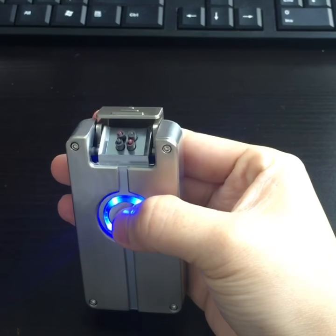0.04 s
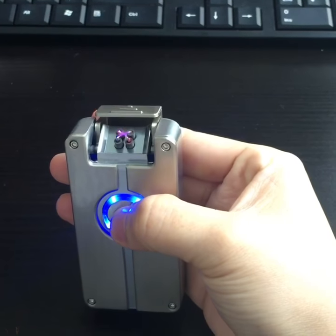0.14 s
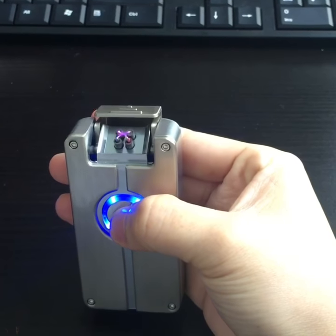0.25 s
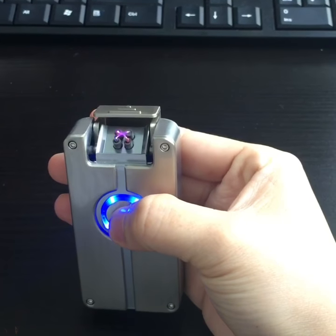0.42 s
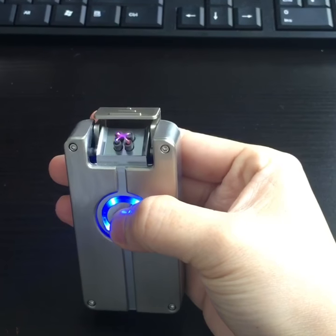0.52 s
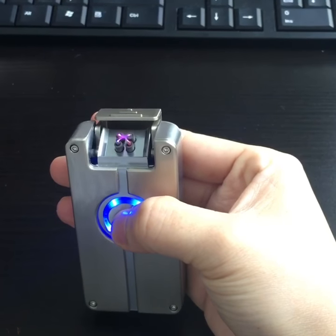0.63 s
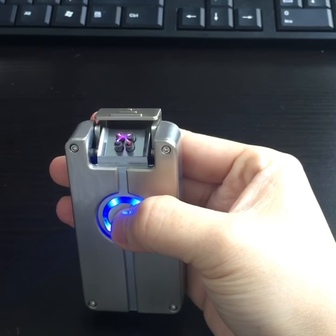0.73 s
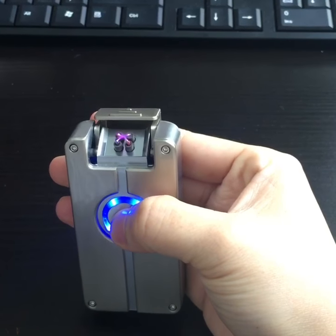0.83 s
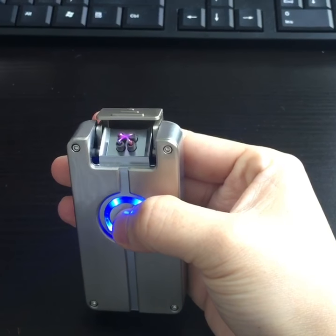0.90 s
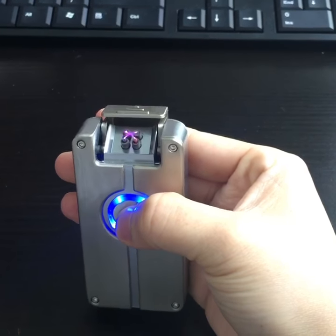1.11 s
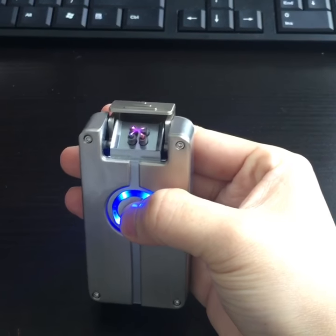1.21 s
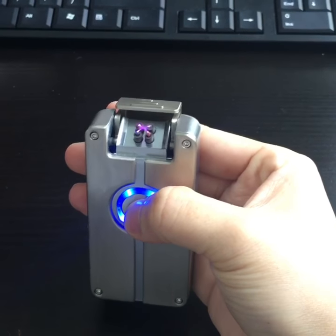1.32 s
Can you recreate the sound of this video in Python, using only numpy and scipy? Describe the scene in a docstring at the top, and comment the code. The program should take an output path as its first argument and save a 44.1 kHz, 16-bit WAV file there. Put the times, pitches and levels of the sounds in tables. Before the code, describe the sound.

A metal arc lighter's button clicks with a low thump and brief ring; the arc instantly hisses, breaks into dry crackles and pops, and weakens. Close microphone, quiet room, faint desk and wall reflections.

```python
"""In a quiet room, low rumble and mains hum (shaped noise and steady sines) last throughout.
A thumb rubs a lighter's button (faint noise), which ticks (short noise and ringing), then snaps with a thump.
At the snap the electric arc strikes: dense random pulses hiss, then grow fewer and crackle over a soft fizz.
Later come separate loud sparks (single pulses in a sputter), with one short flare of dense pulses among them.
The lighter is close to the ear; desk and walls answer it faintly."""
import sys
import numpy as np
from scipy import signal
from scipy.fft import rfft, irfft, next_fast_len
from scipy.io import wavfile
from scipy.ndimage import uniform_filter1d, minimum_filter1d

SR = 44100
rng = np.random.default_rng(int(sys.argv[2]) if len(sys.argv) > 2 else 0)


def wav_out(sig):
    """Save sig, one row per channel (or a flat mono array), as 16-bit PCM at SR to the path in sys.argv[1]."""
    wavfile.write(sys.argv[1], SR, np.round(np.clip(np.atleast_2d(sig).T, -1, 1) * 32767).astype(np.int16))


N = 59535
T = np.arange(N) / SR  # time of each sample, s
SNAP_S = .2362  # the button gives way and the arc strikes


def amp(db):
    """Turn decibels into a gain."""
    return 10 ** (np.asarray(db) / 20)


def unit(x):
    """Scale a sound to an rms of 1."""
    return x / np.sqrt(np.mean(x ** 2) + 1e-20)


def gain(points, hz):
    """Read the gain at hz from a colour table, with pitch on a log axis."""
    f, db = np.transpose(points)
    return amp(np.interp(np.log(hz + 1), np.log(np.sort(f) + 1), db))


def filtered(x, response):
    """Weight each frequency of x by a response, which may also shift its phase."""
    size = next_fast_len(N + SR // 2)  # spare room so the end does not wrap to the start
    spectrum = rfft(x, size) * response(np.fft.rfftfreq(size, 1 / SR))
    return irfft(spectrum, size)[:N]


def noise(points):
    """Random noise with the given colour and an rms of 1."""
    return unit(filtered(rng.standard_normal(N), lambda hz: gain(points, hz)))


def coloured(x, points, size=2048):
    """Colour pulses without any sound before them, and keep each pulse's energy."""
    # Folding the cepstrum forward in time gives the minimum-phase pulse of this colour
    cepstrum = irfft(np.log(gain(points, np.fft.rfftfreq(size, 1 / SR))))
    cepstrum[1:size // 2] *= 2
    cepstrum[size // 2 + 1:] = 0
    pulse = irfft(np.exp(rfft(cepstrum)))
    return signal.fftconvolve(x, pulse / np.linalg.norm(pulse))[:N]


def decay(start, t60):
    """A sudden start that fades by 60 dB in t60 seconds."""
    return (T >= start) * amp(-60 * np.maximum(T - start, 0) / t60)


def ringing(start, modes):
    """Fading sine tones, all struck at one moment."""
    total = 0
    for hz, db, t60 in modes:
        total = total + amp(db) * decay(start, t60) * np.sin(2 * np.pi * hz * (T - start))
    return total


def discharges(rate):
    """Tiny sparks as random pulses of uneven size, rate a second, with a mean power of 1."""
    size_spread_db = 4.5
    chance = np.clip(rate / SR, 1e-4, 1)  # of a pulse in each sample
    sizes = amp(size_spread_db * np.clip(rng.standard_normal(N), -2, 2))
    pulses = (rng.random(N) < chance) * sizes
    centred = pulses - chance * sizes.mean()
    # Dividing by sqrt(chance) keeps the power even as the pulses grow fewer
    return -unit(centred / np.sqrt(chance))


# The arc's steady burn: t/s, level/dB, discharges (1/s)
ARC_BURN = [(.238, -25, 9000), (0.269, -31.5, 9000), (.345, -31, 7200), (0.364, -38, 3350),
            (0.466, -37.5, 1470), (.478, -48, 870), (.57, -48, 800), (.6, -55.5, 750), (0.63, -44, 800),
            (.72, -55.5, 580), (.82, -54.5, 540), (.86, -67.5, 400), (.93, -56.5, 610), (1.03, -62, 510),
            (1.13, -58.5, 590), (1.35, -62, 430)]
# Loudness of the soft fizz: t/s, level/dB
FIZZ_LEVEL = [(.24, -43.5), (.45, -46), (.49, -53), (.7, -56.5), (.84, -61), (.915, -60.5), (.93, -53),
              (1.0, -58), (1.08, -62), (1.095, -50), (1.16, -57), (1.28, -56), (1.35, -54.5)]
# Colour of the dense hiss, also of the flare: f/Hz, level/dB (relative, per Hz)
HISS_COLOUR = [(40, -20), (150, -3), (300, 4), (900, -4.5), (2400, -2), (5000, -3.5), (7200, 3), (8100, -3),
               (9200, 4.5), (10400, -2), (11400, 2.5), (13000, -3), (14400, 6), (15200, -53)]
# Colour of the thin crackle, also of bright sparks: f/Hz, level/dB (relative, per Hz)
CRACKLE_COLOUR = [(40, -29), (150, -2.5), (320, 12), (850, -1.5), (2000, -0.5), (2800, -3), (4200, 1),
                  (5000, -5), (7200, 3), (8100, -4), (9000, 3), (10400, -3.5), (11300, 4), (12500, -2.5),
                  (14000, -43), (15500, -51.5)]
# Colour of the soft fizz: f/Hz, level/dB (relative, per Hz)
FIZZ_TONE = [(60, 17), (400, 6), (900, 4.5), (2000, 3), (3000, 0), (5000, -2), (7200, -3), (10000, -7),
             (12300, -11), (13600, -30), (15000, -40)]


def arc():
    """Many discharges a second blur into a hiss; fewer are heard as crackle, over a soft fizz."""
    t, db, rate = np.transpose(ARC_BURN)
    rate = np.interp(T, t, rate)
    lit = T > SNAP_S
    burn = lit * amp(np.interp(T, t, db)) * discharges(rate)
    dense = np.clip(rate / 1800, 0, 1) ** 2  # 1 = all hiss, towards 0 = crackle
    hiss = coloured(burn * dense, HISS_COLOUR)
    crackle = coloured(burn * (1 - dense), CRACKLE_COLOUR)
    fizz = lit * amp(np.interp(T, *np.transpose(FIZZ_LEVEL))) * noise(FIZZ_TONE)
    return hiss + crackle + fizz


# Single loud sparks: t/s, level/dB, dullness (0 bright to 1 dull)
LOUD_SPARKS = [(0.4822, -16, 0.0), (0.5054, -18, 0.0), (0.5178, -19, 0.0), (0.5243, -16, 0.0),
               (0.5332, -17, 0.0), (0.5451, -18, 0.0), (0.5568, -21, 0.1), (0.5618, -20, 0.0),
               (0.5697, -20, 0.0), (0.5757, -15, 0.0), (0.5786, -17, 0.0), (0.5863, -24, 0.0),
               (0.6318, -17, 0.0), (0.6364, -22, 0.1), (0.6638, -22, 0.0), (0.6807, -20, 0.0),
               (0.6846, -21, 0.0), (0.6895, -22, 0.0), (0.6918, -25, 0.0), (0.6961, -22, 0.0),
               (0.7117, -22, 0.0), (0.719, -23, 0.0), (0.746, -28, 0.0), (0.7747, -28, 0.0),
               (0.7832, -28, 0.0), (0.7981, -28, 0.0), (0.8565, -26, 0.0), (0.8593, -29, 0.0),
               (0.8833, -24, 0.0), (0.9243, -26, 0.0), (0.9332, -26, 0.0), (0.9678, -24, 0.4),
               (0.9737, -21, 0.0), (0.9914, -27, 0.3), (1.0939, -26, 0.0), (1.1273, -28, 0.0),
               (1.1701, -23, 0.0), (1.1757, -26, 0.2), (1.1804, -22, 0.1), (1.1927, -27, 0.2),
               (1.215, -24, 0.5), (1.2395, -25, 0.3), (1.2987, -21, 0.2), (1.3036, -28, 0.4),
               (1.3127, -26, 1.0), (1.3227, -28, 0.8), (1.3258, -18, 1.0)]
# Colour of the dull sparks: f/Hz, level/dB (relative, per Hz)
DULL_COLOUR = [(40, -15), (300, 1.5), (900, 4.5), (2100, 7), (4200, -2), (5500, -8), (9000, -4),
               (12500, -14), (15000, -42)]


def sparks():
    """Each loud spark is one sharp pulse inside a brief sputter; some are bright, some dull."""
    sputter_db, sputter_s = -18, 0.00047  # level beside the pulse; time to fade to 1/e on each side
    bright, dull = np.zeros((2, N))
    sputter = amp(sputter_db) * rng.standard_normal(N)
    for t, db, dullness in LOUD_SPARKS:
        crack = sputter * np.exp(-abs(T - t) / sputter_s)
        crack[round(t * SR)] = -1  # the sharp pulse itself
        bright += amp(db) * (1 - dullness) * crack
        dull += amp(db) * dullness * crack
    return coloured(bright, CRACKLE_COLOUR) + coloured(dull, DULL_COLOUR)


# Colour of the flare's low puff: f/Hz, level/dB (relative, per Hz)
PUFF_COLOUR = [(50, -13), (170, 3), (350, -2.5), (700, -25), (1200, -8.5), (2500, -32), (8000, -45)]


def flare():
    """The arc leaps: a short swell of dense discharges with a low puff at its middle."""
    start_s, length_s, rate = .637, 0.021, 5500  # rate in discharges per second
    burst_db, puff_db = -32, -34
    swell = np.sin(np.pi * np.clip((T - start_s) / length_s, 0, 1)).clip(0)
    burst = coloured(amp(burst_db) * np.sqrt(swell) * discharges(rate), HISS_COLOUR)
    puff = amp(puff_db) * swell ** 2 * noise(PUFF_COLOUR)
    return burst + puff


# Light ticks as the button starts to move: t/s, level/dB
BUTTON_TICKS = [(.1993, -37.5), (0.2126, -54)]
# Colour of each tick's noise: f/Hz, level/dB (relative, per Hz)
TICK_COLOUR = [(200, -15), (700, 2), (1500, 2), (3000, -4), (8000, -13), (14500, -19), (16000, -30)]
# Tones the button rings with at each tick: f/Hz, level/dB (relative), fade by 60 dB (s)
BUTTON_TONES = [(1275, -1.5, 0.018), (2990, -7, 0.021), (5230, -8.5, 0.018), (8100, -9.5, .02)]
# Colour of the push just before the snap: f/Hz, level/dB (relative, per Hz)
PUSH_COLOUR = [(25, -25), (80, 0), (200, 5.5), (450, -3.5), (900, -19), (3000, -30.5), (8000, -70)]
# Colour of the thump through the metal case: f/Hz, level/dB (relative)
THUMP_COLOUR = [(20, -33), (35, -14.5), (58, -4.5), (110, -5.5), (155, -0.5), (260, -3.5), (400, -5),
                (470, -8.5), (540, -7.5), (650, -12), (1100, -15.5), (2100, -22.5), (2700, -28.5),
                (5000, -44), (8000, -41.5), (14500, -38.5), (16400, -66)]
# Tones the metal case rings with: f/Hz, level/dB, fade by 60 dB (s)
CASE_TONES = [(2075, -25, 0.026), (3100, -26, 0.069), (3400, -33, 0.087), (3700, -38, 0.11)]
# Colour of the loose button's rattle: f/Hz, level/dB (relative, per Hz)
RATTLE_COLOUR = [(300, -3), (1000, 1), (3500, 4), (5000, -10), (14500, -6), (16000, -19)]


def button():
    """Ticks and a swelling push, then the snap: a thump with late bass, a ringing case and a rattle."""
    tick_t60_s = 0.015
    push_db, push_rise_s = -22.5, .007
    snap_db, lag_cycles, zero_shift_hz = 29.5, 0.506, 2910
    rattle_db, rattle_t60_s = -17, 0.033

    ticks = 0
    for t, db in BUTTON_TICKS:
        touch = decay(t, tick_t60_s) * noise(TICK_COLOUR)
        ticks = ticks + amp(db) * (touch + ringing(t, BUTTON_TONES))
    swell = (T < SNAP_S) * np.exp(-abs(T - SNAP_S) / push_rise_s)
    push = amp(push_db) * swell * noise(PUSH_COLOUR)

    impulse = amp(snap_db) * (np.arange(N) == round(SNAP_S * SR))
    blow = coloured(impulse, THUMP_COLOUR, size=8192)
    # Each pitch is late by about the same part of its own cycle, so the bass arrives last
    thump = filtered(blow, lambda hz: np.exp(-2j * np.pi * lag_cycles * np.log((hz + 1) / zero_shift_hz)))
    rattle = amp(rattle_db) * decay(SNAP_S, rattle_t60_s) * noise(RATTLE_COLOUR)
    return ticks + push + thump + ringing(SNAP_S, CASE_TONES) + rattle


# Colour of the thumb's low rumble: f/Hz, level/dB (relative, per Hz)
RUB_RUMBLE_COLOUR = [(80, -27), (165, 4), (230, -7), (600, -37)]
# Colour of the thumb's hiss: f/Hz, level/dB (relative, per Hz)
RUB_HISS_COLOUR = [(1000, 4), (5000, 2), (14500, -9), (16000, -25)]


def thumb():
    """Skin rubs faintly on the button, a low rumble with hiss, until it gives way."""
    start_s, fade_in_s = 0.1196, 0.0044
    rumble_db, hiss_db = -53, -73
    pressing = np.clip((T - start_s) / fade_in_s, 0, 1) * (T < SNAP_S)
    return pressing * (amp(rumble_db) * noise(RUB_RUMBLE_COLOUR) + amp(hiss_db) * noise(RUB_HISS_COLOUR))


def echo(x):
    """Desk and walls answer with many random reflections that quickly fade."""
    tail = rng.standard_normal(N) * decay(0.00083, 0.23)  # first reflection (s), fade by 60 dB (s)
    return signal.fftconvolve(x, tail / np.linalg.norm(tail))[:N]


# Colour of the room's rumble: f/Hz, level/dB (relative, per Hz)
ROOM_COLOUR = [(20, -29), (45, -1), (75, -4), (110, -4), (170, -1), (280, -9.5), (420, -20), (600, -23),
               (1000, -28), (2000, -31.5), (3000, -36.5), (6000, -41), (14500, -42), (16000, -63)]
# Mains hum tones: f/Hz, level/dB
HUM_TONES = [(119, -55), (301, -63)]


def room():
    """Low rumble as shaped noise, and mains hum as steady sine tones."""
    rumble_db = -51
    hum = 0
    for hz, db in HUM_TONES:
        hum = hum + amp(db) * unit(np.sin(2 * np.pi * (hz * T + rng.random())))
    return amp(rumble_db) * noise(ROOM_COLOUR) + hum


def scene():
    """The lighter close by with its faint echo, and the room behind it."""
    press_echo_db, buzz_echo_db = -54, -16.5
    press = thumb() + button()
    buzz = arc() + sparks() + flare()
    reflections = echo(amp(press_echo_db) * press + amp(buzz_echo_db) * buzz)
    return (press + buzz + reflections + room())[None]


def record(dry):
    """A gain control turns down for peaks over its ceiling and creeps back; then the top treble is cut."""
    ceiling, recovery_db_per_s, top_hz = 0.86, 20, 16446
    over_db = 20 * np.log10(np.maximum(abs(dry[0]) / ceiling, 1))
    recovery = recovery_db_per_s * T
    # Hold the deepest cut so far, shrinking steadily with time
    cut_db = np.maximum.accumulate(over_db + recovery) - recovery
    # Start the cut slightly early and smooth its edges (91 samples, about 2 ms)
    gain_db = uniform_filter1d(minimum_filter1d(-cut_db, size=91), size=91)
    return filtered(dry[0] * amp(gain_db), lambda hz: hz < top_hz)[None]


dry = scene()
out = record(dry)
wav_out(out)
```